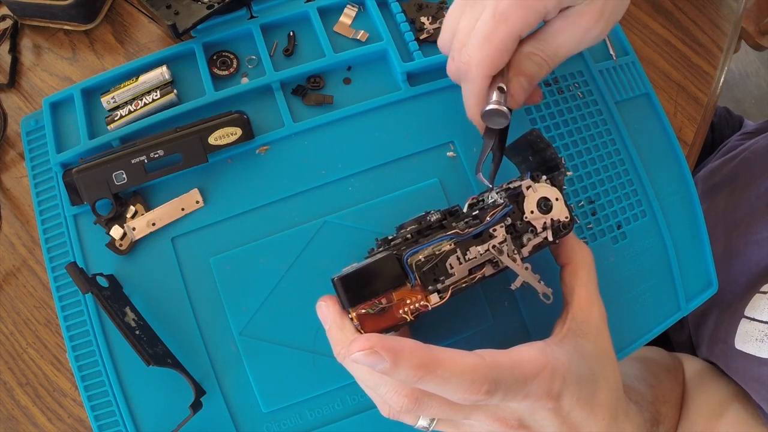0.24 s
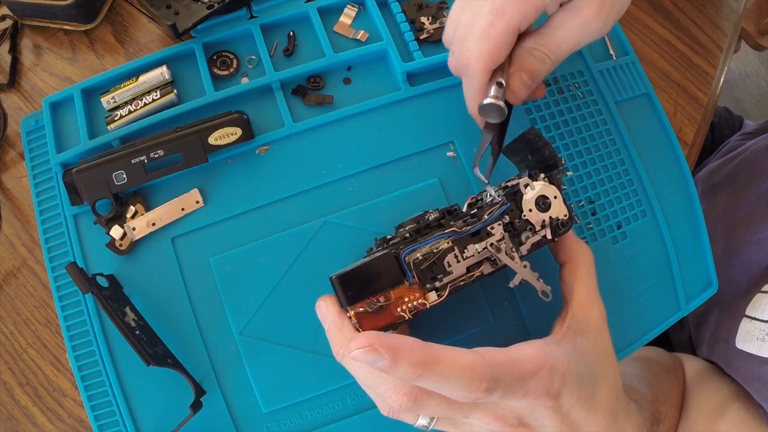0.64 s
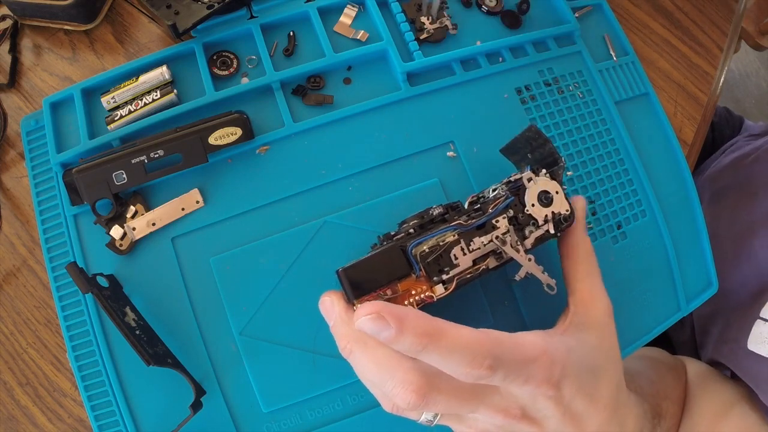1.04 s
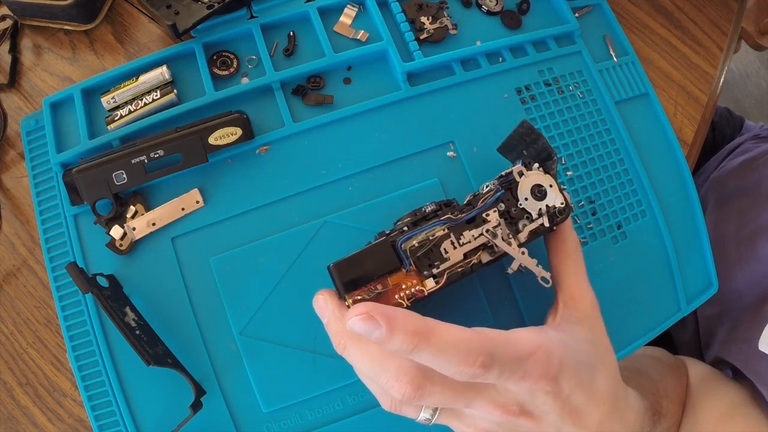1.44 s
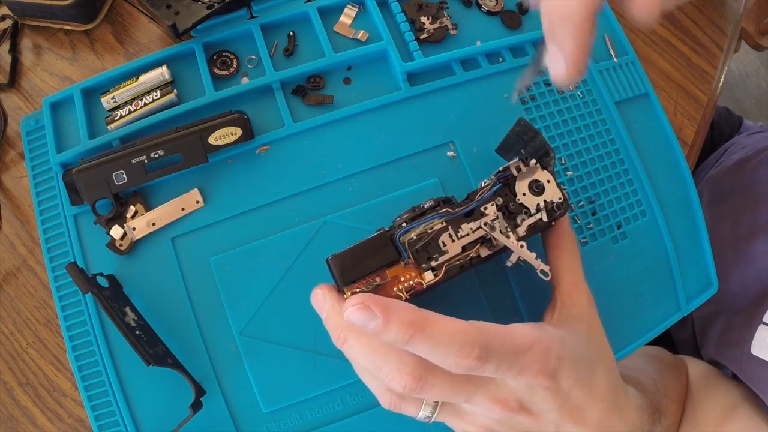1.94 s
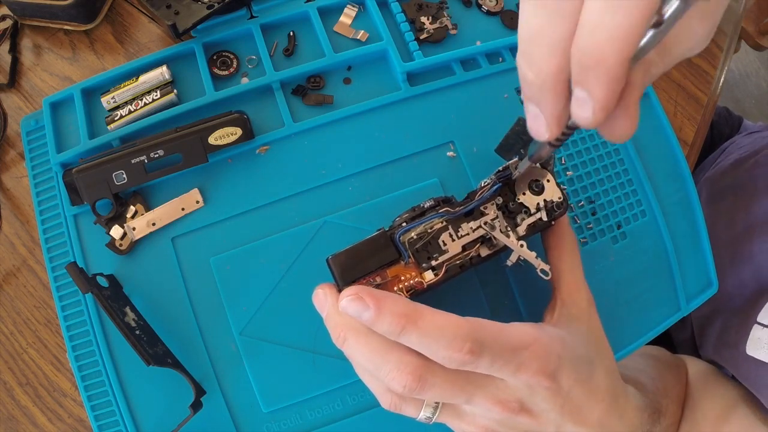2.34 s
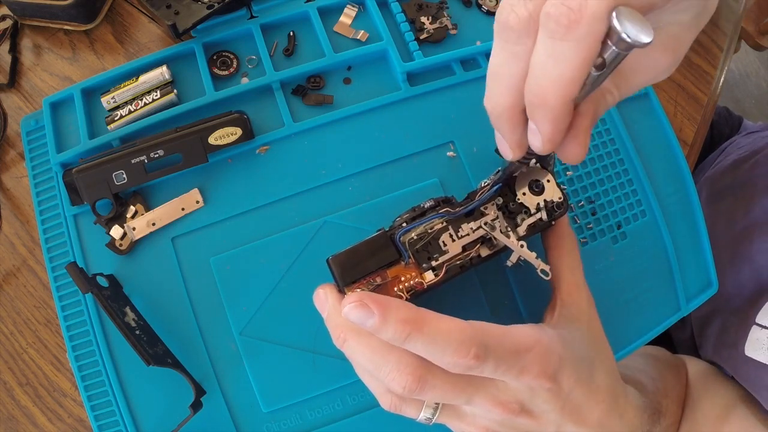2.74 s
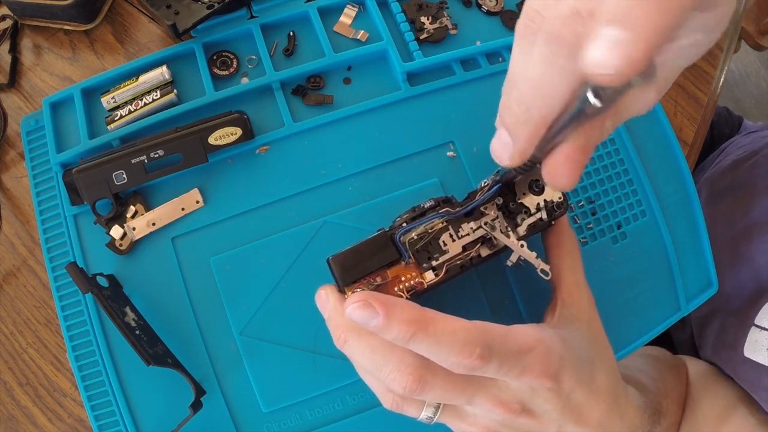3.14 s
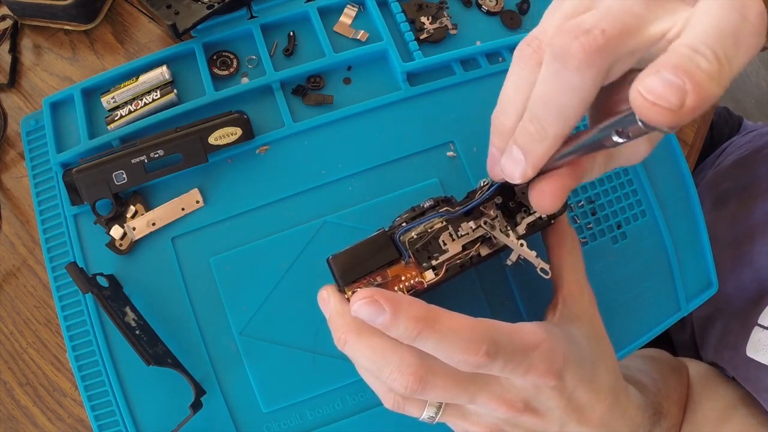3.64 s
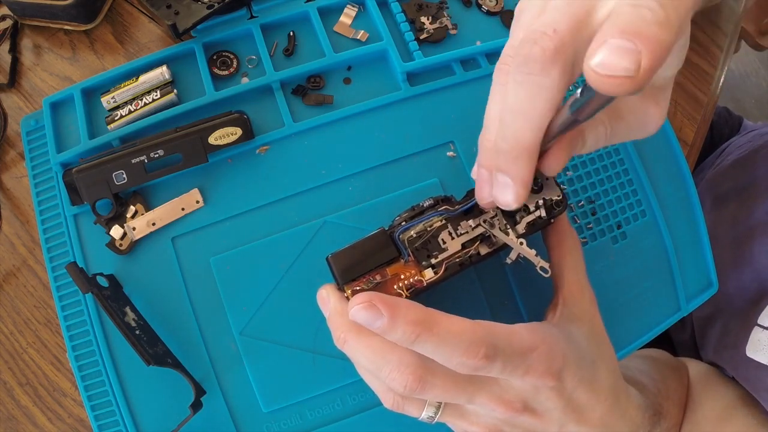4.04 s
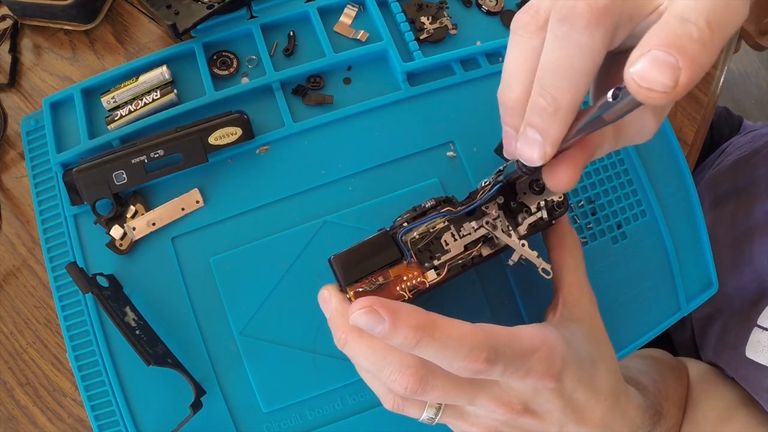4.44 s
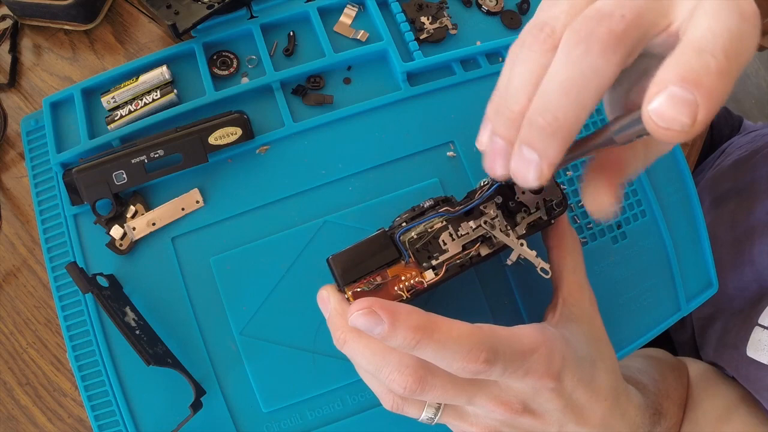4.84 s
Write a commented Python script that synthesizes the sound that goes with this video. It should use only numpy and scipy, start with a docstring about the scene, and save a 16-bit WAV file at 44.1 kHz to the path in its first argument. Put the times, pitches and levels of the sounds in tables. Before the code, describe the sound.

In a quiet small room, a hand tool taps and skids on a hollow device body, with a sharp snap, ticks and two overloading knocks.

```python
"""Room noise, faint narrow bands of high hiss and a soft low rustle, all shaped noise, run throughout.
After a second a tool knocks lightly on an opened camera body and skids; a plastic catch snaps, its spring rings.
A tool is laid on the rubber mat with a short clatter of struck modes, then short high metallic ticks sound in pairs
of modes. A very hard knock, a swelling resonance of the hollow body, overloads the recorder; lighter knocks and
rasping skids follow, and a second hard knock overloads it near the end. Echoes and a tail form a small room."""
import sys
import numpy as np
from scipy import signal
from scipy.fft import rfft, irfft, next_fast_len
from scipy.io import wavfile
from scipy.ndimage import uniform_filter1d

SR = 44100
rng = np.random.default_rng(int(sys.argv[2]) if len(sys.argv) > 2 else 0)


def generate_wav(sig):
    """Save sig (samples, or channels by samples) to the path in sys.argv[1] as 16-bit PCM at SR."""
    pcm = np.round(np.clip(np.atleast_2d(sig).T, -1, 1) * 32767).astype(np.int16)
    wavfile.write(sys.argv[1], SR, pcm)


N = 224733  # length of the scene in samples


def amp(db):
    """Decibels to gain."""
    return 10 ** (np.asarray(db) / 20)


def evened(x):
    """Scales to an rms of one."""
    return x / np.sqrt(np.mean(x ** 2) + 1e-20)


def read(points, hz):
    """Reads a table on a log-frequency axis."""
    table_hz, value = np.transpose(points)
    return np.interp(np.log(hz + 1), np.log(table_hz + 1), value)


def add(mix, start_s, sound):
    """Mixes a sound in at its start time, cut off at the end of the mix."""
    part = mix[round(start_s * SR):][:len(sound)]
    part += sound[:len(part)]


def noise(gain):
    """Noise of rms one with the spectrum gain(Hz)."""
    size = next_fast_len(N)
    spectrum = rfft(rng.standard_normal(size)) * gain(np.fft.rfftfreq(size, 1 / SR))
    return evened(irfft(spectrum, size)[:N])


def wander(rate_hz):
    """Slow chance of rms one."""
    return noise(lambda f: np.exp(-(f / rate_hz) ** 2))


def patchy(x, depth_db, size=14):
    """Lets the level drift a little, separately in patches of time and pitch."""
    z = signal.stft(x, SR, nperseg=512)[2]
    drift = uniform_filter1d(rng.standard_normal(z.shape), size, axis=1)  # along time
    drift = evened(uniform_filter1d(drift, size // 2, axis=0))  # along pitch
    return evened(signal.istft(z * amp(depth_db * drift), SR, nperseg=512)[1][:N])


def swell(crest_s, spread):
    """An envelope that rises smoothly to its crest and dies more slowly."""
    u = np.arange(1, SR // 8) / SR / crest_s
    return np.exp(-.5 * (np.log(u) / spread) ** 2)


def pop(hz, crest_s, spread, sag=0.):
    """A damped resonance that swells over a few cycles; its pitch starts low by the share sag."""
    envelope = swell(crest_s, spread)
    u = np.arange(len(envelope)) / SR / crest_s
    pitch_hz = hz * (1 - sag * np.exp(-u ** 2))
    return envelope * np.sin(2 * np.pi * np.cumsum(pitch_hz) / SR)


def ring(modes, rise_s):
    """Modes struck together, each dying at its own speed."""
    t = np.arange(SR // 5) / SR
    tones = np.zeros(len(t))
    for hz, db, t60_s in modes:
        tones += amp(db - 60 * t / t60_s) * np.sin(2 * np.pi * (hz * t + rng.random()))
    return tones * (1 - np.exp(-(t / rise_s) ** 2))


def rasp(hz, width_hz, crest_s, spread):
    """Many tiny slips in one broad resonance, under one swell."""
    envelope = swell(crest_s, spread)
    f = np.fft.rfftfreq(len(envelope), 1 / SR)
    resonance = 1 / (1 + ((f - hz) / width_hz) ** 2) ** 2
    slips = irfft(rfft(rng.standard_normal(len(envelope))) * resonance, len(envelope))
    return evened(slips * envelope) * np.sqrt(np.mean(envelope ** 2))


# spectrum of the room noise: (frequency [Hz], relative level per Hz [dB])
AIR_SPECTRUM = [(12, -51.5), (20, -33), (193, -2), (368, -2), (545, -4.5), (763, -2.5), (1300, -4.5),
                (2270, -4.5), (4980, -14.5), (7590, -22.5), (8970, -25), (10000, -19.5), (11500, -31.5),
                (14900, -29.5), (16200, -50)]
AIR_DB = -59.1  # rms
# faint narrow bands of high hiss: (centre [Hz], width at half amplitude [Hz], rms level [dB])
HISS_BANDS = [(4930, 200, -83), (9880, 300, -76), (13905, 8, -92), (14850, 150, -95)]


def background():
    """Slightly restless room noise, and faint high hiss made of noise in narrow resonant bands."""
    air = amp(AIR_DB) * patchy(noise(lambda f: amp(read(AIR_SPECTRUM, f))), depth_db=1.6)
    hiss = np.zeros(N)
    for hz, width_hz, db in HISS_BANDS:
        hiss += amp(db) * noise(lambda f: 1 / (1 + (2 * (f - hz) / width_hz) ** 2))
    return air + hiss


# single echoes from nearby surfaces: (delay [s], level [dB])
SURFACE_ECHOES = [(.0068, -16), (.0117, -21), (.0165, -24), (.0250, -24), (.0330, -27)]
# decay of the tail: (frequency [Hz], time to fall by 60 dB [s])
TAIL_T60 = [(200, .18), (900, .14), (1600, .15), (3000, 0.12), (8000, .12)]


def room(x, tail_db, build_up_s):
    """Single echoes from nearby surfaces and a short diffuse tail that dies at its own speed per pitch."""
    size = SR // 3
    taps = rng.choice([-1., 1.], size) * (rng.random(size) < 3000 / SR)  # about 3000 reflections per s
    hz, t, z = signal.stft(taps, SR, nperseg=256)
    z = z * amp(-60 * t / read(TAIL_T60, hz)[:, None])
    lag_s = np.arange(size) / SR
    tail = signal.istft(z, SR, nperseg=256)[1][:size] * (1 - np.exp(-(lag_s / build_up_s) ** 2))
    response = amp(tail_db) * tail / np.linalg.norm(tail)
    for delay_s, db in SURFACE_ECHOES:
        # uneven surfaces dull the treble of an echo
        add(response, delay_s, amp(db) * signal.windows.hann(11) / 5)
    return signal.fftconvolve(x, response)[:N]


# spectrum of the low rustle: (frequency [Hz], relative level per Hz [dB])
RUSTLE_SPECTRUM = [(60, -24), (130, -4), (250, -1.5), (450, -3), (800, 0), (1200, -3.5), (2500, -17),
                   (5000, -37), (12000, -56.5)]
# level of the low rustle over time: (time [s], level before the rustle gain [dB])
RUSTLE_LEVEL = [(0.0, -70), (0.52, -66), (0.99, -69), (1.52, -63), (1.89, -69), (2.24, -66), (3.22, -71),
                (4.67, -66), (5.1, -68)]


def low_rustle(uneven_db=2.5, rustle_db=1.8):
    """A soft, uneven rustle: low noise whose level flutters and slowly rises and falls."""
    rub = patchy(noise(lambda f: amp(read(RUSTLE_SPECTRUM, f))), depth_db=3.2)
    rustle = evened(rub * amp(uneven_db * wander(rate_hz=21.97)))
    level_s, level_db = np.transpose(RUSTLE_LEVEL)
    return amp(rustle_db + np.interp(np.arange(N) / SR, level_s, level_db)) * rustle


# short high metallic ticks, the last one together with a knock:
# (time [s], level of the lower mode [dB], lower mode [Hz], upper mode [Hz])
METALLIC_TICKS = [(1.684, -53, 6350, 11400), (1.766, -60, 7050, 10900), (2.016, -59, 3400, 3800),
                  (2.1475, -41, 3600, 3870), (2.291, -55, 3650, 4020), (3.9515, -32, 3314, 4480)]
TICK_CREST_S, UPPER_MODE_DB = .003, 2.5  # the upper mode is the louder


def ticks():
    """Short high metallic ticks: two short resonances with a little grit."""
    out = np.zeros(N)
    for start_s, db, lower_hz, upper_hz in METALLIC_TICKS:
        for hz, mode_db in (lower_hz, 0), (upper_hz, UPPER_MODE_DB):
            grit = rasp(hz, width_hz=900, crest_s=TICK_CREST_S, spread=.5)
            tone = pop(hz, TICK_CREST_S, spread=.42)
            add(out, start_s, amp(db + mode_db) * (tone + amp(-14) * grit))
    return out


# bounces of a tool laid on the mat: (time [s], level [dB], metal ring relative to the bounce [dB])
BOUNCES = [(1.4865, -39.5, -12), (1.5080, -22.5, -16), (1.5170, -29.5, -12), (1.5362, -29.5, 7),
           (1.5385, -28.5, -12)]
# dull modes of table and handle: (frequency [Hz], relative level [dB], time to fall by 60 dB [s])
TABLE_MODES = [(290, -11, 0.037), (556, -7, .02), (750, -6, 0.017), (1013, -8, 0.024), (1420, 1.5, 0.022),
               (2160, -6, .02), (2310, -3, 0.013)]
# ring of the tool's metal: (frequency [Hz], relative level [dB], time to fall by 60 dB [s])
METAL_MODES = [(1355, 1, .045), (4700, -33, .07), (5400, -38, 0.062), (8580, -39, 0.17), (12400, -39, .08)]
# it scrapes from when its weight comes down until the last bounce, then settles
SCRAPE_AT_S, SCRAPE_ATTACK_S, SCRAPE_DB, SETTLE_DB_PER_S = 1.501, .006, -39.5, 320


def clatter(grains_per_s=1500):
    """The tool lands handle first, scrapes along the mat, bounces, and its metal end rings."""
    t, last_bounce_s = np.arange(N) / SR, BOUNCES[-1][0]
    grains = rng.standard_normal(N) * (rng.random(N) < grains_per_s / SR)
    scrape = evened(signal.oaconvolve(grains, ring(TABLE_MODES, rise_s=0.00049))[:N])
    attack = np.clip((t - SCRAPE_AT_S) / SCRAPE_ATTACK_S, 0, 1)
    settling_db = SETTLE_DB_PER_S * np.maximum(t - last_bounce_s, 0)
    out = scrape * attack * amp(SCRAPE_DB - settling_db)
    for start_s, db, metal_db in BOUNCES:
        thud = ring(TABLE_MODES, rise_s=0.0013)
        metal = ring(METAL_MODES, rise_s=0.00047)
        add(out, start_s, amp(db) * (thud + amp(metal_db) * metal))
    return out


# modes of the plastic catch: (frequency [Hz], level relative to the snap [dB], time to the crest [s])
CATCH_MODES = [(770, 1, .0041), (1504, -7, .005), (1130, -16, 0.0042), (1680, -20, .004), (2130, -29, .004),
               (2340, -24, 0.0057), (3110, -16, .0045), (4750, -31.5, 0.0039), (5800, -45.5, .004)]
# thin spring: (frequency [Hz], level relative to the snap [dB], time to fall by 60 dB [s])
SPRING_MODES = [(1405, -33, .19), (1463, -30, .2), (1603, -35, .19), (3200, -48, .25)]
SNAP_AT_S, SNAP_DB = 1.3258, -6


def snap():
    """The catch lets go: its modes sound at once, loose parts chatter, and a spring rings on."""
    out = np.zeros(N)
    catch = sum(amp(db) * pop(hz, crest_s, spread=.4, sag=0.035) for hz, db, crest_s in CATCH_MODES)
    chatter = amp(-27) * rasp(1400, width_hz=1300, crest_s=.007, spread=.7)
    add(out, SNAP_AT_S, catch + chatter)
    add(out, SNAP_AT_S, ring(SPRING_MODES, rise_s=.004))
    return amp(SNAP_DB) * out


# the tip skids on the body: (time [s], level [dB], time to the crest [s])
TIP_SKIDS = [(1.182, -51, .01), (1.268, -50, .022), (3.130, -50, .018), (3.168, -44, .014),
             (3.440, -52, .014), (4.111, -43, .005), (4.176, -46.5, .012), (4.297, -43, .007)]
SKID_HZ = 830  # every skid rasps in the same resonance
# while the tip probes the body it also slips faintly, at random; SLIP_S is the time to the crest
PROBE_FROM_S, PROBE_TO_S, SLIPS_PER_S, SLIP_DB, SLIP_S = 3.2, 4.45, 5, -54, .008


def skids():
    """The tip slips a little way and rasps in the body's resonance; fainter slips fall in between."""
    out = np.zeros(N)
    probe_s = PROBE_TO_S - PROBE_FROM_S
    chances = rng.random(round(SLIPS_PER_S * probe_s))
    slips = [(PROBE_FROM_S + chance * probe_s, SLIP_DB, SLIP_S) for chance in chances]
    for start_s, db, crest_s in TIP_SKIDS + slips:
        add(out, start_s, amp(db) * rasp(SKID_HZ, width_hz=520, crest_s=crest_s, spread=.55))
    return out


# main resonance of the body and its neighbours:
# (factor on the pitch, relative level [dB], factor on the time to the crest)
BODY_MODES = [(1, 0, 1), (.7, -25, .9), (1.2, -19, 1.1)]
# overtones of the body: (frequency [Hz], relative level [dB], time to the crest [s])
BODY_OVERTONES = [(2130, -2.5, .007), (3280, -3, .0021), (1420, -16, .008)]
# knocks on the hollow body: (time [s], level [dB], pitch [Hz], hardness of contact as overtone level [dB])
BODY_KNOCKS = [(1.1805, -41, 820, -18), (2.7794, 4, 972, -20), (2.9095, -27, 975, -35),
               (3.1545, -35, 980, -22), (3.1730, -34, 920, -16), (3.2905, -43, 930, -9),
               (3.3490, -47, 790, -20), (3.5420, -39.5, 760, -25), (3.7115, -43, 820, -22),
               (3.9515, -13, 1060, -40), (4.1112, -41, 850, -18), (4.8860, 1.8, 1012, -49)]
# a light knock crests after CREST_S; a full-scale blow takes CREST_GROWTH_S longer
CREST_S, CREST_GROWTH_S = .0034, .00078
# the softer the contact, the lower the pitch starts: share of the pitch per dB of overtones under HARD_DB
SAG_PER_DB, HARD_DB = .005, -9


def knocks():
    """The tool rocks the hollow body: one broad resonance, with overtones when the contact is hard."""
    out = np.zeros(N)
    for start_s, db, hz, overtones_db in BODY_KNOCKS:
        crest_s = CREST_S + CREST_GROWTH_S * amp(db)
        sag = SAG_PER_DB * max(HARD_DB - overtones_db, 0)
        body = sum(amp(mode_db) * pop(hz * ratio, crest_s * late, spread=.42, sag=sag)
                   for ratio, mode_db, late in BODY_MODES)
        overtones = sum(amp(mode_db) * pop(mode_hz, rise_s, spread=0.28)
                        for mode_hz, mode_db, rise_s in BODY_OVERTONES)
        add(out, start_s, amp(db) * (body + amp(overtones_db) * overtones))
    return out


def scene(count=5, low_hz=130):
    """All the handling, its room and the background; the tail changes in steps as the hands move."""
    work = ticks() + clatter() + snap() + skids() + knocks()
    # the microphone cuts the bass of the handling sounds
    work = signal.sosfilt(signal.butter(2, low_hz, "highpass", fs=SR, output="sos"), work)
    # each equal stretch of time gets its own chance tail
    place = np.arange(N) * count // N
    echo = sum(room(work * (place == k), tail_db=-16, build_up_s=.006) for k in range(count))
    return (background() + low_rustle() + echo + work)[None]


EDGE_HZ = 16300  # upper band limit


def record(dry):
    """The recorder clips at full scale; then a steep lowpass limits the band."""
    clipped = np.clip(dry, -1, 1)
    lowpass = signal.firwin(511, EDGE_HZ, window=("kaiser", 9), fs=SR)
    return signal.oaconvolve(clipped, lowpass[None], "same")


dry = scene()
out = record(dry)
generate_wav(out)
```